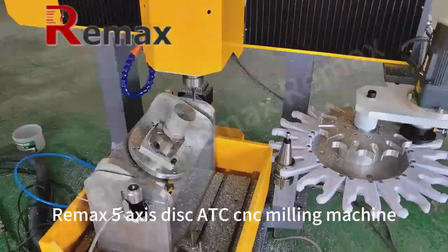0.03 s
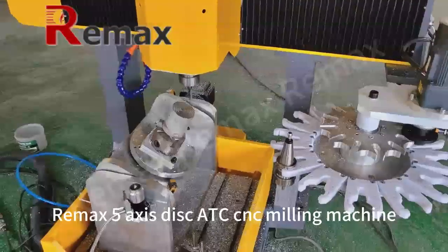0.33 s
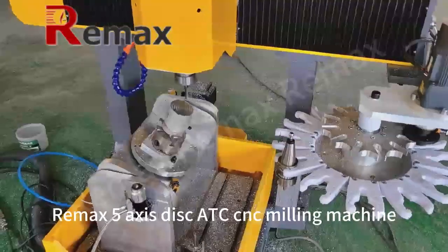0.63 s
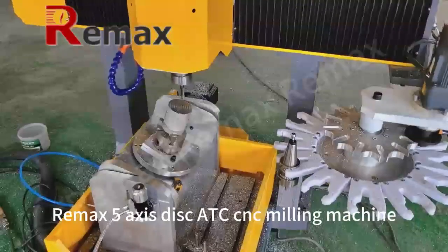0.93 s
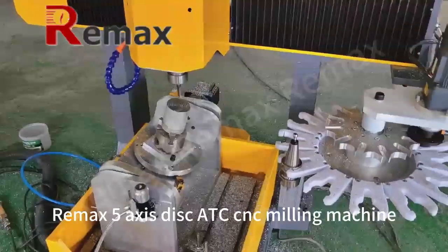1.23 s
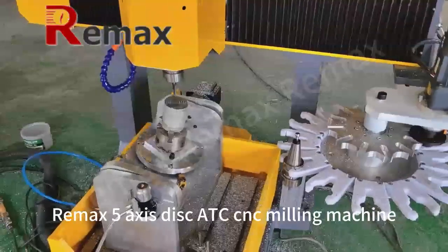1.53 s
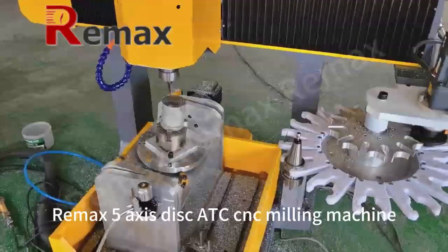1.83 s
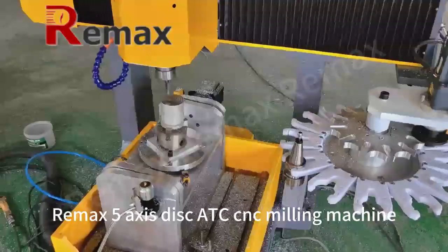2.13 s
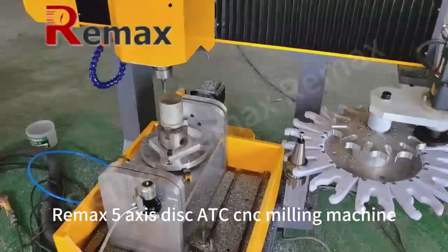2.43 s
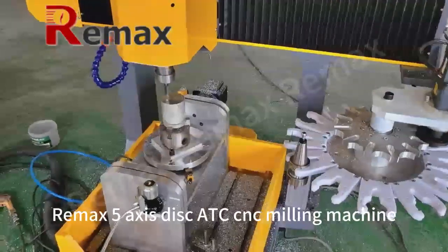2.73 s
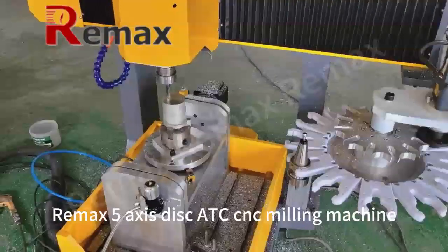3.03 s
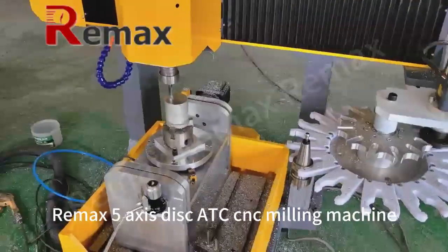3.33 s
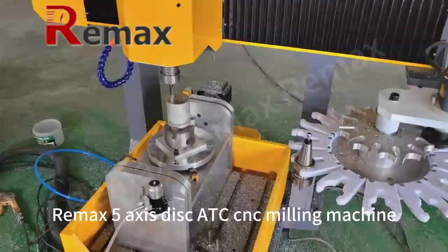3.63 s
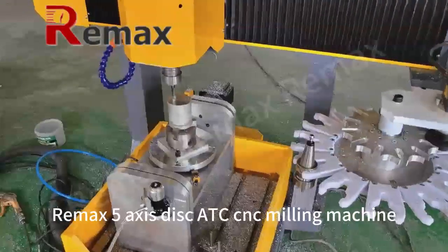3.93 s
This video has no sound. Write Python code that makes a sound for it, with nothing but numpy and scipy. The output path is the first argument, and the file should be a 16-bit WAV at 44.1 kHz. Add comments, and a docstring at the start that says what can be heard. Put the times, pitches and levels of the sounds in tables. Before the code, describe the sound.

In a workshop, a milling tool rasps through metal twice, chattering against the steady pitch of its spindle. When the tool leaves the metal, the spindle hums on with light air hiss and background rumble.

```python
"""In a workshop, a milling spindle turns about 294 times a second, cuts metal in two sweeps, then runs free.
The cut is a rasping hiss that pulses with each turn and sets the machine's frame ringing.
The workpiece and the tool each shake at their own pitch (chatter), beating against the spindle's hum.
Blown air and the workshop's rumble go on underneath."""
import sys
import numpy as np
from scipy import signal
from scipy.fft import rfft, irfft
from scipy.io import wavfile

SR = 44100
rng = np.random.default_rng(int(sys.argv[2]) if len(sys.argv) > 2 else 0)


def transcribe(signal):
    """Save signal, clipped to [-1, 1], as a 16-bit WAV file at the path in sys.argv[1]."""
    frames = np.atleast_2d(signal).T
    limited = np.clip(frames, -1, 1)
    pcm = np.round(limited * 32767).astype(np.int16)
    wavfile.write(sys.argv[1], SR, pcm)


N = 176400
TIME = np.arange(N) / SR


def from_db(db):
    """Turn decibels into a gain."""
    return 10 ** (np.asarray(db) / 20)


def rms_one(x):
    """Scale a signal so its average strength (rms) is 1."""
    return x / np.sqrt(np.mean(x ** 2) + 1e-20)


def in_time(rows):
    """Join (time, value) points with straight lines."""
    return np.interp(TIME, *np.transpose(rows))


def drift(rate_hz):
    """A smooth random wobble of size about 1; a higher rate wobbles faster."""
    step = 40  # samples between random values
    r = np.exp(-2 * np.pi * rate_hz * step / SR)
    slow = signal.lfilter([1], [1, -2 * r, r * r], rng.standard_normal(N // step + 2002))[2000:]
    return np.interp(np.arange(N) / step, np.arange(len(slow)), rms_one(slow))


def coloured(x, spectrum):
    """Make some frequencies stronger and others weaker; rms 1."""
    hz, db = np.transpose(spectrum)
    bins_hz = np.maximum(np.arange(N // 2 + 1) * SR / N, 1)
    gain = from_db(np.interp(np.log(bins_hz), np.log(hz), db))
    return rms_one(irfft(rfft(x) * gain, N))


def resonate(x, hz, width_hz):
    """Ring around one pitch, already sounding at the start; rms 1."""
    r = np.exp(-np.pi * width_hz * np.sqrt(2) / SR)
    section = [1 - r, 0, r - 1, 1, -2 * r * np.cos(2 * np.pi * hz / SR), r * r]
    return rms_one(signal.sosfilt([section, section], np.r_[x[-SR:], x])[SR:])


def workshop():
    """The hall and the idle machine rumble low."""
    # tone of the rumble: f/Hz, relative level/dB
    spectrum = [(25, -36.5), (60, -26.5), (100, -13), (130, -12.5), (160, -17.5), (200, -3.5), (240, -3.5),
                (290, 2.5), (340, -11.5), (395, -3.5), (440, -18), (520, -18), (610, -16.5), (680, -15),
                (770, -28), (1100, -45.5)]
    return from_db(-41.5) * coloured(rng.standard_normal(N), spectrum)


def air():
    """Blown air hisses with a slight flicker."""
    # strength of the air blast: t/s, level/dB
    blast = [(0, -52.5), (3.0, -46), (3.35, -46.5), (3.6, -46), (4, -44.5)]
    # tone of the air: f/Hz, relative level/dB
    spectrum = [(400, -15.5), (780, -2.5), (950, 5.5), (1150, 5.5), (1400, 1), (1600, 5.5), (1750, 1),
                (1950, 5), (2450, 0), (3350, 1), (4000, -1), (4850, 2.5), (5700, 0.5), (6500, -0.5),
                (7300, 2), (8200, -.5), (9600, -2), (11000, -31)]
    return from_db(in_time(blast) + .73 * drift(12)) * coloured(rng.standard_normal(N), spectrum)


def shifting(ring):
    """A ring wanders in pitch and strength as the tool's point of contact moves; rms 1."""
    position = np.cumsum(1 + .015 * drift(3))
    bent = np.interp(position, np.arange(N), ring, period=N)
    return rms_one(bent * from_db(1.5 * drift(3)))


def frame(load):
    """The random push of the cut makes the frame and clamp ring; the higher rings wander."""
    # their resonances: f/Hz, width/Hz, level in a full cut/dB
    resonances = [(126.7, 8.9, -59), (201.8, 17, -42.5), (219.6, 26, -42), (276, 30, -37.5),
                  (498.6, 29, -45), (654, 22.4, -38.5), (981, 51, -43), (1052, 50, -37.5),
                  (1170, 70, -41.5), (1363, 60, -46.5), (1635, 110, -46), (2019, 77, -49.5),
                  (2340, 91, -47), (3350, 71, -52), (4640, 240, -46), (5260, 350, -47), (6960, 290, -57.5)]
    rings = 0
    for hz, width_hz, db in resonances:
        ring = resonate(rng.standard_normal(N), hz, width_hz)
        rings = rings + from_db(db) * (shifting(ring) if hz > 900 else ring)
    return load * rings


def chatter(angle, hz, level, tones, wander_rad):
    """A shake that feeds itself until the tool leaves the metal; the turning adds side tones."""
    phase = 2 * np.pi * hz * TIME + wander_rad * drift(4.1) + rng.uniform(0, 2 * np.pi)
    shake = sum(from_db(db) * np.sin(round(turns) * angle + round(swings) * phase)
                for turns, swings, db in tones)
    release_db = -80 * np.maximum(TIME - level[-1][0], 0)
    return np.sqrt(2) * from_db(in_time(level) + release_db + 1.8 * drift(20.5)) * shake


def workpiece_chatter(angle):
    """The workpiece shakes at a pitch below the hum."""
    # strength of the shake: t/s, level/dB
    level = [(0.0, -39), (0.05, -29), (0.11, -37.5), (0.27, -32.5), (0.51, -44.5), (0.77, -34),
             (1.31, -33.5), (1.34, -37), (1.72, -52), (1.76, -37), (1.85, -31.5), (1.95, -31.5),
             (1.99, -38.5), (2.16, -33), (2.26, -29.5), (2.38, -35), (2.5, -35), (2.88, -54), (2.9, -56)]
    # its tones: spindle multiple, chatter multiple, relative level/dB
    tones = [(0, 1, 0.9), (2, -1, -13.5), (1, 1, -8.5), (2, 1, -20.5), (4, -1, -19.5)]
    return chatter(angle, 252.3, level, tones, wander_rad=.15)


def tool_chatter(angle):
    """The tool shakes at a pitch above the hum."""
    # strength of the shake: t/s, level/dB
    level = [(0.0, -32.5), (0.18, -34.5), (0.29, -42.5), (0.33, -34.5), (0.5, -34.5), (0.78, -33),
             (0.92, -33.5), (0.98, -43), (1.06, -33), (1.2, -29.5), (1.31, -39), (1.42, -34.5),
             (1.5, -38.5), (1.74, -30.5), (1.95, -35), (2.05, -29), (2.15, -37), (2.24, -31), (2.31, -38),
             (2.4, -28.5), (2.56, -43), (2.78, -44), (2.85, -54), (2.9, -46)]
    # its tones: spindle multiple (rounded on use), chatter multiple, relative level/dB
    tones = [(0, 1, -0.5), (-1, 1, -20.5), (1.5, 1, -21), (3, -1, -17.5)]
    return chatter(angle, 394.3, level, tones, wander_rad=.55)


def spindle(angle, load):
    """The spindle hums at its turning rate; of its wavering overtones, the top two grow with load."""
    # strength of the hum: t/s, level/dB
    hum = [(0.0, -21), (0.18, -23), (0.21, -24), (0.46, -28.5), (0.5, -21.5), (0.58, -26), (0.61, -22),
           (0.65, -25.5), (0.69, -21), (0.73, -24), (0.77, -20), (0.85, -23.5), (0.88, -21), (0.95, -22),
           (1.18, -21), (1.37, -26.5), (1.4, -24.5), (1.465, -30), (1.54, -24.5), (1.71, -21.5),
           (1.97, -22.5), (2.05, -19), (2.16, -23), (2.23, -20.5), (2.32, -23.5), (2.38, -20), (2.44, -23),
           (2.48, -17.5), (2.52, -17.5), (2.555, -25.5), (2.64, -16), (2.69, -21.5), (2.8, -22.5),
           (3.0, -25.5), (3.93, -24), (4.0, -23.5)]
    # the overtone an octave up: t/s, level/dB
    octave = [(0, -63), (.45, -45), (.66, -44.5), (.73, -38), (.85, -41.5), (1.2, -39.5), (1.42, -46.5),
              (1.78, -38), (2.1, -42), (2.4, -43.5), (2.68, -35.5), (2.8, -48), (2.88, -36.5),
              (2.97, -41.5), (3.06, -57), (4, -49.5)]
    # higher overtones: spindle multiple, level from a full cut/dB, level running free/dB
    overtones = [(3, -46, -62), (4, -44, -67.5)]
    gains = [(2, from_db(in_time(octave)))]
    gains += [(k, np.hypot(load * from_db(cut), from_db(free))) for k, cut, free in overtones]
    sound = from_db(in_time(hum) + .5 * load * drift(30)) * np.cos(angle)
    waver_depth = .47
    for multiple, gain in gains:
        waver = 1 + waver_depth * (drift(13) + 1j * drift(13))  # moves both strength and phase
        sound = sound + gain * np.real(waver * np.exp(1j * multiple * angle)) / np.hypot(1, waver_depth)
    return np.sqrt(2) * sound


def reflected(x, count=8):
    """Short echoes off the table and housing sound hollow and shift as the machine travels; rms 1."""
    sound = x
    for delay_s in rng.uniform(.001009, .013, count):
        source_s = TIME - delay_s - .00013 * drift(.6)
        sound = sound + from_db(-14) * rng.choice([-1, 1]) * np.interp(source_s, TIME, x)
    return rms_one(sound)


def cutting(angle, bite_db, chips_per_s=1500):
    """Metal hisses as it is sheared off and tiny chips strike; both pulse once a turn."""
    chips = (rng.random(N) < chips_per_s / SR) * rng.choice([-1, 1], N)
    chips = chips * from_db(3 * np.minimum(rng.exponential(1, N), 4))  # a few hit harder
    pulse = 1 + .055 * np.cos(angle)
    force = (rng.standard_normal(N) + from_db(-7) * rms_one(chips)) * pulse
    # tone of the hiss: f/Hz, relative level/dB
    rasp = [(25, -31), (60, -19.5), (150, -21.5), (220, -8), (430, 0), (600, -0.5), (780, -3), (930, 1),
            (1220, 1), (1440, 2), (1600, 1), (1850, -1.5), (2150, -2.5), (2550, -1), (2850, -4.5),
            (3150, -2.5), (3600, -3.5), (4100, -6), (4550, -5.5), (5000, -5), (5500, -7), (6100, -8.5),
            (6800, -8), (7500, -7), (8400, -11.5), (9100, -8.5), (9600, -17.5)]
    return from_db(bite_db - 1.5 + .35 * drift(30)) * coloured(reflected(force), rasp)


def scene():
    """The turning and the tool's bite drive the cut; everything is heard from the centre."""
    # spindle speed, rising as the load comes off: t/s, speed/(turns per s)
    speed = [(0, 294.2), (.5, 294.45), (1.1, 294.3), (1.5, 294.45), (2.1, 294.3), (2.7, 294.4),
             (3.0, 294.9), (4, 294.9)]
    # how hard the tool bites, which sets the hiss: t/s, level/dB
    bite = [(0, -29.5), (.06, -28), (.2, -30.5), (.39, -33), (.53, -30), (.62, -31.5), (.74, -27.5),
            (.9, -27.5), (.99, -29.5), (1.06, -26), (1.11, -28), (1.16, -28), (1.22, -27), (1.31, -31),
            (1.44, -33.5), (1.51, -37), (1.63, -35), (1.77, -28), (1.86, -27), (1.92, -29.5), (2.02, -29),
            (2.07, -25), (2.13, -28), (2.33, -28), (2.42, -26.5), (2.6, -30), (2.69, -29.5), (2.78, -35.5),
            (2.84, -37), (2.95, -45.5)]
    full_cut_db, exit_db_per_s = -28, 175  # the bite fades fast as the tool leaves the metal
    angle = 2 * np.pi * np.cumsum(in_time(speed)) / SR
    bite_db = in_time(bite) - exit_db_per_s * np.maximum(TIME - bite[-1][0], 0)
    load = from_db(.61 * (bite_db - full_cut_db))  # 1 in a full cut
    shaking = workpiece_chatter(angle) + tool_chatter(angle)
    mix = shaking + spindle(angle, load) + cutting(angle, bite_db) + frame(load) + workshop() + air()
    return np.array([mix, mix])


def record(dry):
    """The treble above 9650 Hz is cut steeply."""
    return signal.sosfilt(signal.ellip(12, .1, 80, 9650, fs=SR, output="sos"), dry)


dry = scene()
out = record(dry)
transcribe(out)
```